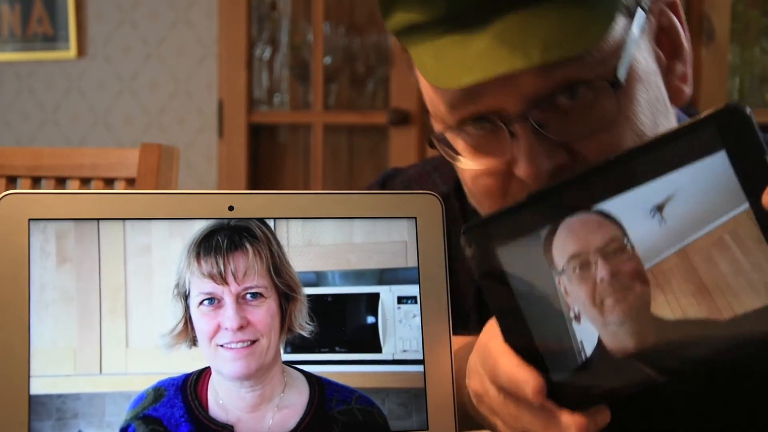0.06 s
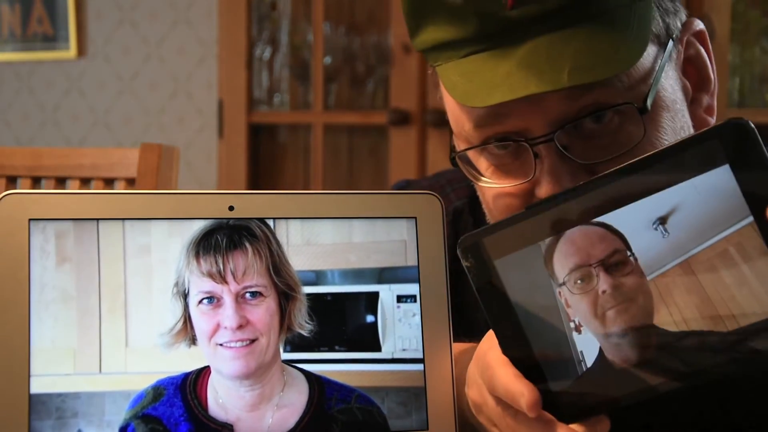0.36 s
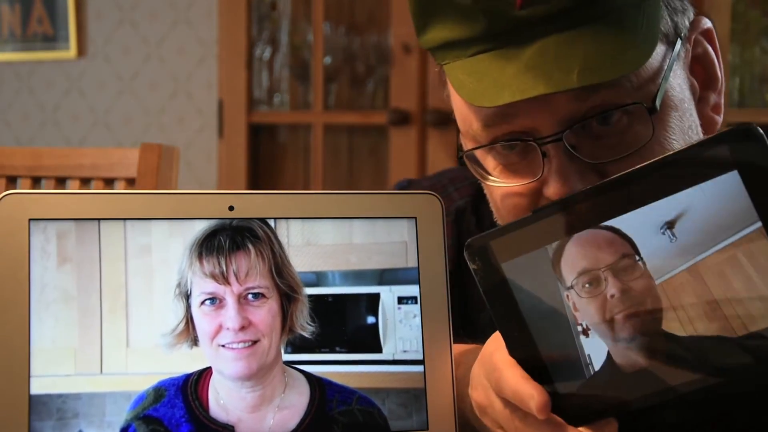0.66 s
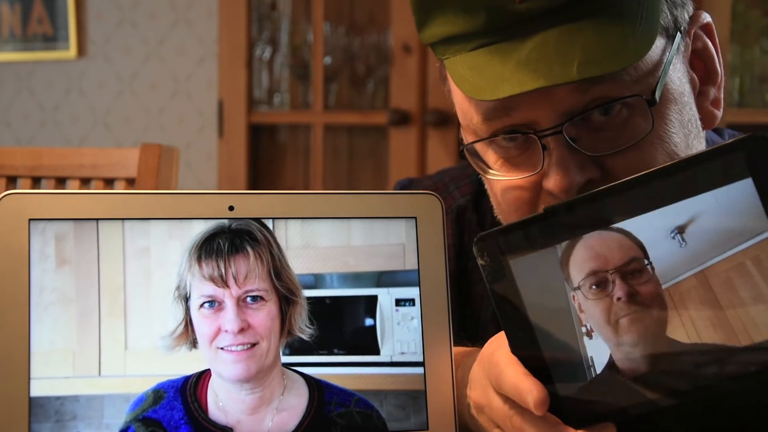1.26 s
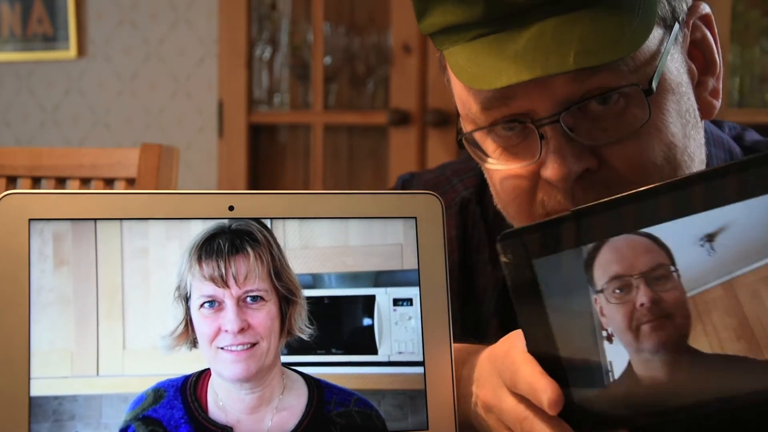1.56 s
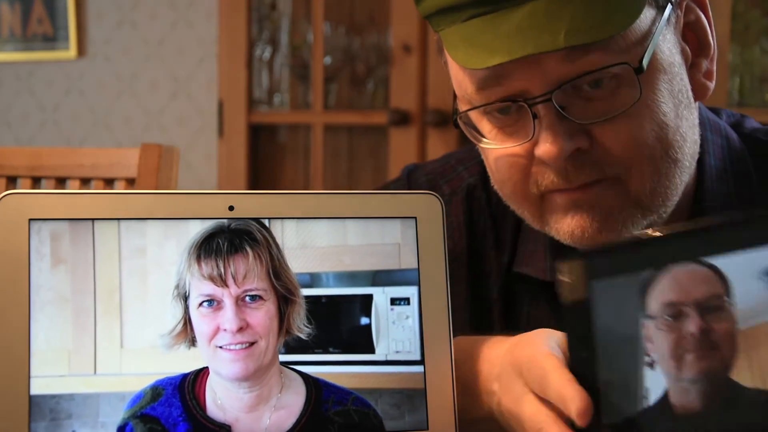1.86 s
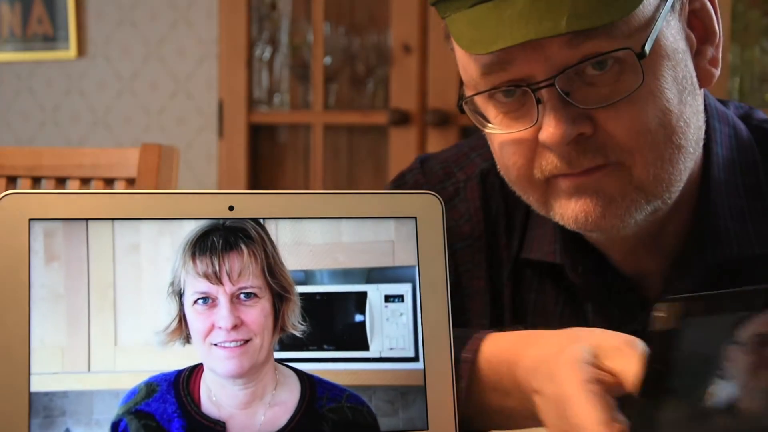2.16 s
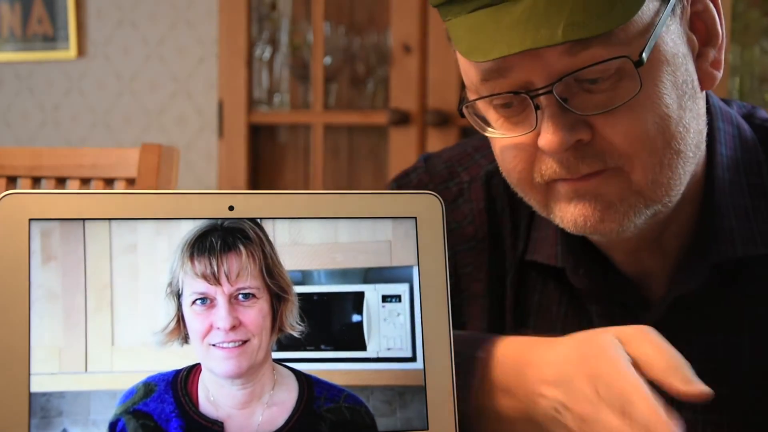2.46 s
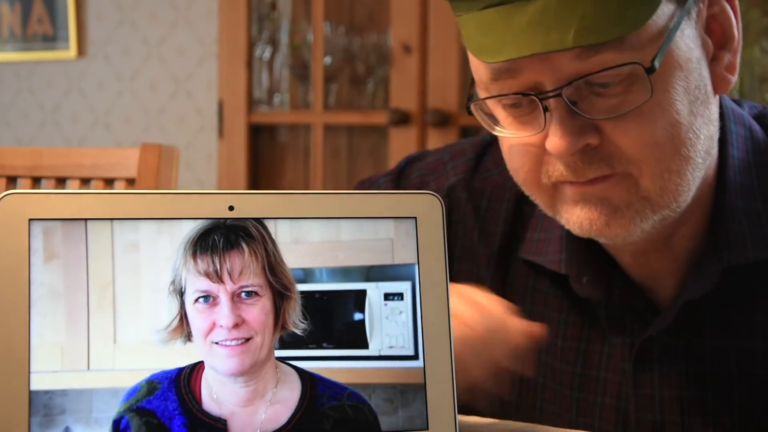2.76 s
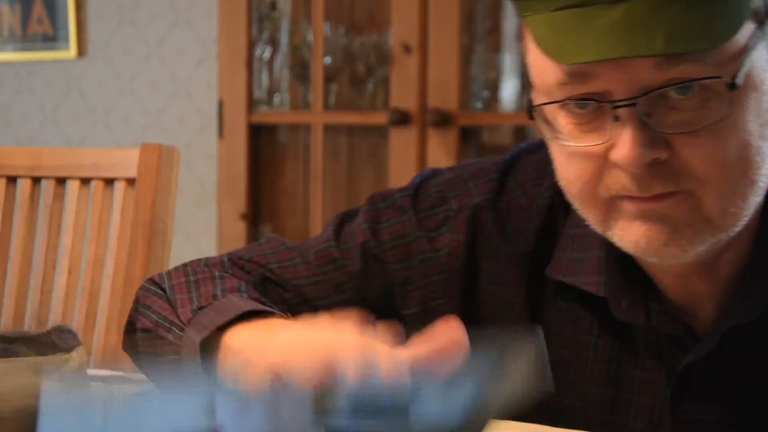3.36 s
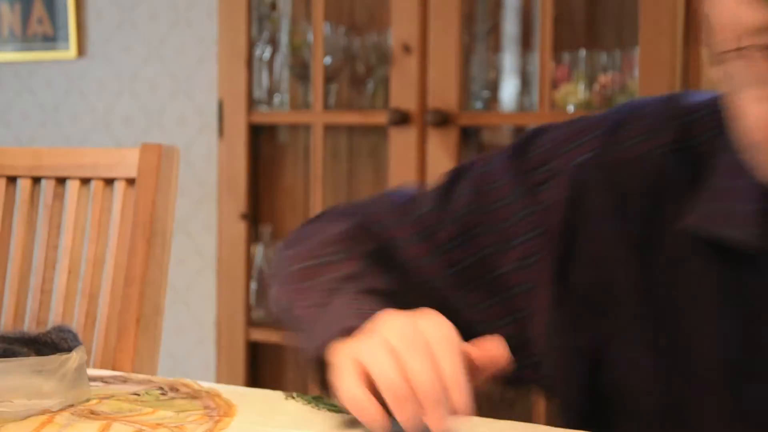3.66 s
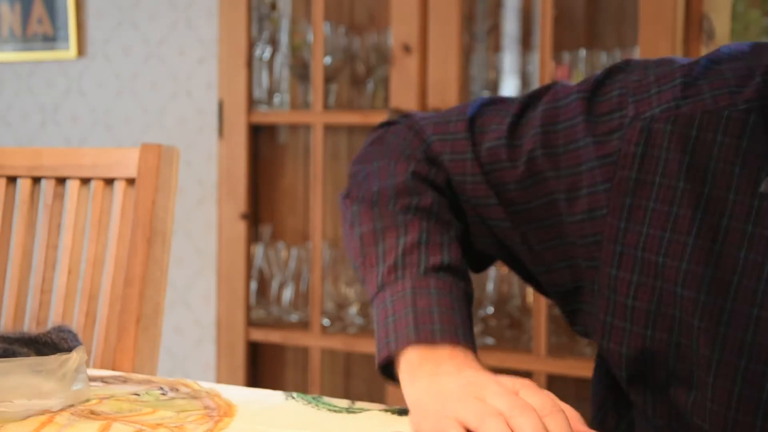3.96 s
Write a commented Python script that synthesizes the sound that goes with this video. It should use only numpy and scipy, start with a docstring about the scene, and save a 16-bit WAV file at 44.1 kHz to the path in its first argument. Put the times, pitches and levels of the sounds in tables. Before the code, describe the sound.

A laptop lid shuts with a loud thud, just after a tablet is set down.

```python
"""Putting down a tablet, shutting a laptop

In a quiet, fairly echoey dining room with a low hum and microphone hiss, sleeves rustle, a chair creaks
and hands bump a wooden table. A tablet lands on its edge, then falls flat; each knock rings briefly.
A laptop lid is slapped shut, pushing out a puff of air and overloading the microphone for a moment."""
import sys
import numpy as np
from scipy import signal
from scipy.fft import rfft, irfft, next_fast_len
from scipy.io import wavfile

SR = 44100
rng = np.random.default_rng(int(sys.argv[2]) if len(sys.argv) > 2 else 0)


def digitize_waveform(pressure):
    """Quantize a signal to 16-bit integers and store it at the path in sys.argv[1].

    Rows of a 2-D input are taken as channels; values are limited to [-1, 1].
    """
    field = np.atleast_2d(pressure).T
    bounded = np.clip(field, -1, 1)
    quanta = np.round(bounded * 32767).astype(np.int16)
    wavfile.write(sys.argv[1], SR, quanta)


N = 176400
T = np.arange(N) / SR
SIZE = next_fast_len(N + SR)  # a spare second leaves space for echoes
HZ = np.fft.rfftfreq(SIZE, 1 / SR)

# tone of the hiss, meaning how strong its lows and highs are next to each other: f/Hz, level/dB
HISS_TONE = [(30, -14), (44, -7.5), (92, -9.5), (125, -14.5), (150, -15.5), (310, -15), (360, -18.5),
             (480, -17), (600, -19.5), (1460, -23), (2550, -24.5), (4310, -22), (10600, -33),
             (16000, -39.5)]
# faint whistling bands in the hiss: f/Hz, width/Hz, level/dB
WHISTLES = [(2130, 270, -68), (4310, 140, -73.5)]
# steady rumble and hum: f/Hz, level/dB
HUM_NOTES = [(19.4, -57), (120, -66)]
# how alike left and right are, for the hiss and for other noise: f/Hz, likeness (1 = the same)
HISS_LIKENESS = [(50, 0.88), (500, 0.68), (2000, 0.55), (5000, 0.65), (9000, 0.26), (15000, 0.067)]
ROOM_LIKENESS = [(100, 1), (1000, 1), (4000, 0.97), (9000, 0.94), (15000, 0.2)]
# sleeve movements: middle t/s, width/s, level/dB, brightness/(dB per octave)
SLEEVE_MOVES = [(.06, 0.14, -58.5, -0.5), (.19, 0.031, -60, 4), (1.47, 0.046, -61.5, 4),
                (2.0, 0.29, -58.5, 3), (2.33, 0.1, -56, 1.5), (2.6, 0.035, -43.5, 0.5),
                (3.12, 0.22, -57.5, 2), (3.46, 0.032, -66, 3), (3.808, 0.036, -46, 1.5),
                (3.93, 0.036, -52.5, -2)]
# creaks of chair and case: middle t/s, width/s, f/Hz, level/dB
CREAK_EVENTS = [(.05, 0.056, 358, -58), (.19, 0.034, 462, -56), (1.173, 0.014, 1800, -58),
                (2.015, 0.016, 490, -60), (3.402, 0.0048, 343, -45), (3.981, 0.013, 351, -44)]
# bumps of hands and forearm: t/s, level/dB, brightness/(dB per octave)
BUMP_HITS = [(1.998, -26, 2), (2.452, -12.5, 3), (3.104, -14.5, -9.5), (3.395, -20.5, -1),
             (3.905, -23, 0.5), (3.971, -15.5, -3)]
# hits of the tablet (case, edge, flat back) and the lid (grab, slap, rattle): t/s, level/dB
TICK_HITS = [(1.172, -28), (2.572, -13)]
EDGE_HITS = [(2.4598, 13.5), (2.4662, 10.5)]
FLAT_HITS = [(2.6272, 14.66), (2.6358, 6.1)]
GRAB_HITS = [(3.0503, -12.5), (3.1035, -24)]
SLAP_HITS = [(3.5037, 21.1), (3.5105, 17.8)]
RATTLE_HITS = [(3.5265, 0), (3.535, -6), (3.546, -10)]
# tone of the cloth and of each kind of hit: f/Hz, level/dB
CLOTH_TONE = [(40, -2), (200, 2), (600, 7), (1500, 0), (3000, -5), (7000, -17), (16000, -30)]
TICK_TONE = [(100, -12), (700, 0), (1400, -1), (1830, -7), (2300, -11), (3200, -21), (6000, -30),
             (16000, -46)]
BUMP_TONE = [(30, -4.5), (90, -15), (160, 3.5), (260, -9.5), (380, 1.5), (800, -4), (2000, -24.5),
             (5000, -29), (16000, -42)]
EDGE_TONE = [(25, -28), (70, 1), (140, -1), (300, 0), (420, -7), (750, 1), (1150, -5), (1600, -17.5),
             (2200, -19.5), (3300, -35.5), (8000, -41.5), (16000, -53)]
FLAT_TONE = [(25, -49), (70, -2), (140, -3), (260, 2.5), (520, -1.5), (900, -11.5), (1400, -16),
             (2300, -18), (4000, -28), (7000, -40.5), (16000, -59)]
GRAB_TONE = [(30, -29), (80, -9), (165, -2), (280, -1), (600, -6), (1200, -12), (1750, -12.5),
             (4000, -18.5), (9000, -31), (16000, -50)]
SLAP_TONE = [(25, -25), (80, -4.5), (160, 0.5), (370, -2), (550, 0.5), (800, -2.5), (1200, -10),
             (1900, -16), (2500, -16.5), (3500, -22), (5000, -26), (8000, -37.5), (16000, -51)]
RATTLE_TONE = [(200, -7), (1000, 2), (2500, -3), (5000, 3), (8000, -10), (16000, -16)]
# notes of the object and low notes of the room after a hit: f/Hz, level/dB, time to fade by 60 dB (t/s)
EDGE_NOTES = [(135, -30.5, 0.37), (183, -22.5, 0.18), (297, -46, 0.25), (593, -19, 0.36), (715, -24, 0.28),
              (767, -21.5, 0.27), (900, -25, 0.2)]
FLAT_NOTES = [(65.8, -27, 0.57), (131.6, -13.5, 0.28), (176.5, -18.5, 0.39), (231, -10.5, 0.36),
              (303, -14.5, 0.12), (343, -34, 0.38), (490, -23, 0.26), (634, -36, 0.24), (1980, -34, 0.48)]
GRAB_NOTES = [(161, -31.5, 0.07), (606, -36, 0.025), (880, -42, .03)]
SLAP_NOTES = [(44, -25, 0.63), (84.3, -20, 0.22), (170, -14, 0.22), (330, -22, 0.1), (480, -13.5, 0.12),
              (659, -16.5, 0.54), (734.4, -23, 0.29), (952, -22, .3), (1085, -23, 0.42),
              (1197, -18.5, 0.35), (1302, -30, .35), (1607, -28, 0.41), (2170, -30, 0.3), (3000, -44, .35)]
# first echoes off nearby walls: delay/s, gain
WALL_ECHOES = [(.0026, 0.34), (.0098, 0.1), (0.0122, .25), (0.0202, 0.54)]
# how long the room's tail of blurred echoes takes to fade by 60 dB: f/Hz, t/s
TAIL_FADE = [(50, 0.45), (130, 0.39), (300, 0.43), (700, 0.5), (2000, 0.53), (5000, 0.43), (9000, 0.45),
             (15000, 0.17)]
# tone of that tail: f/Hz, level/dB
TAIL_TONE = [(50, -6), (200, -2.5), (450, -1), (5000, 1), (9000, -0.5), (15000, 1)]


def amp(db):
    """Turn decibels into a gain to multiply by."""
    return 10 ** (np.asarray(db) / 20)


def unit(x):
    """Scale x so that its average power is 1."""
    return x / np.sqrt(np.mean(x ** 2) + 1e-20)


def along(points, hz):
    """Read between the rows of a (frequency, value) table, on a log frequency scale."""
    freqs, values = np.transpose(points)
    return np.interp(np.log(hz + 1), np.log(freqs + 1), values)


def tone(points, tilt_db=0):
    """Turn a tone table into a gain per frequency, tilted by tilt_db per octave above 100 Hz."""
    return unit(amp(along(points, HZ) + tilt_db * np.log2(np.maximum(HZ, 100))))


def filtered(x, gain):
    """Turn each frequency of x up or down by its gain."""
    return irfft(rfft(x, SIZE) * gain, SIZE)[..., :N]


def causal(gain):
    """A filter with this gain that never sounds before it is struck (minimum phase)."""
    cepstrum = irfft(np.log(np.maximum(gain, 1e-6)), SIZE)
    cepstrum[1:SIZE // 2] *= 2
    cepstrum[SIZE // 2 + 1:] = 0
    return np.exp(rfft(cepstrum))


def delay(s):
    """A filter that makes a sound come s seconds later."""
    return np.exp(-2j * np.pi * HZ * s)


def band(hz, width_hz):
    """A filter that favours the frequencies close to hz."""
    return 1 / (1 + (2 * (HZ - hz) / width_hz) ** 2)


def swell(s, width):
    """A bell-shaped rise and fall around time s."""
    return np.exp(-((T - s) / width) ** 2 / 2)


def noise(gain, likeness):
    """Stereo noise: left and right share the middle part and get the side part with opposite signs."""
    angle = np.arccos(np.clip(along(likeness, HZ), -1, 0.9995)) / 2
    shares = np.array([np.cos(angle), np.sin(angle)])
    mid, side = filtered(rng.standard_normal((2, N)), gain * shares)
    return unit(np.array([mid + side, mid - side]))


def echo_tail(build_s=0.002):
    """Countless echoes blur into noise in which each frequency fades at its own speed."""
    hz, t, slices = signal.stft(noise(1, ROOM_LIKENESS)[:, :SR], SR, nperseg=256)
    fade = amp(-60 * t / along(TAIL_FADE, hz)[:, None])
    tail = signal.istft(slices * fade, SR, nperseg=256)[1][:, :SR]
    tail *= 1 - np.exp(-T[:SR] / build_s)
    return tail / np.linalg.norm(tail[0])


def room(tail_db):
    """Two filters: the direct sound with its first wall echoes, and the room's tail."""
    near = 1 + sum(gain * delay(s) for s, gain in WALL_ECHOES)
    tail = amp(tail_db + along(TAIL_TONE, HZ)) * rfft(echo_tail(), SIZE)
    total = np.hypot(1, amp(tail_db))
    return near / total, tail / total


def contact(tail_db, chatter_db, chatter_hz=1390, fade_s=0.025):
    """The spectrum of one touch: a push, hard surfaces chattering above chatter_hz, and the echoes."""
    near, tail = room(tail_db)
    burst = noise(1, ROOM_LIKENESS)[:, :SR] * amp(-60 * T[:SR] / fade_s)
    push = 1 / (1 + 1j * HZ / chatter_hz)  # keeps the lows; 1 - push keeps the highs
    chatter = (1 - push) * rfft(burst / np.linalg.norm(burst[0]), SIZE)
    return near * push + amp(chatter_db) * chatter + tail


def knock(hits, tone_table, tail_db, chatter_db):
    """Short contacts take on the tone of the thing that is hit."""
    force = sum(amp(db) * delay(s) * contact(tail_db, chatter_db) for s, db in hits)
    return irfft(force * causal(tone(tone_table)), SIZE)[:, :N]


def ring(start, notes, attack_s, waver):
    """A knock sets the object and the room's low resonances ringing briefly, wavering a little."""
    t, out = T[:SR], np.zeros(N + SR)
    rise = 1 - np.exp(-t / attack_s)
    for hz, db, fade_s in notes:
        drift = waver * np.cumsum(rng.standard_normal(SR)) * np.sqrt(hz) / SR
        loudness = rise * amp(db - 60 * t / fade_s)
        out[round(start * SR):][:SR] += loudness * np.sin(2 * np.pi * (hz * t + drift))
    return out[:N]


def background(hiss_db=-54, low_cut_hz=30, whine_hz=15703, whine_db=-82):
    """Room noise and microphone hiss with two faint whistles, a steady hum and a thin electronic whine."""
    whistles = sum(amp(db) * noise(band(hz, width), HISS_LIKENESS) for hz, width, db in WHISTLES)
    notes = HUM_NOTES + [(whine_hz, whine_db)]
    hum = sum(amp(db) * np.sqrt(2) * np.sin(2 * np.pi * (hz * T + rng.random())) for hz, db in notes)
    low_cut = HZ ** 2 / np.hypot(HZ ** 2, low_cut_hz ** 2)
    hiss = amp(hiss_db) * noise(tone(HISS_TONE) * low_cut, HISS_LIKENESS)
    return hiss + whistles + hum


def sleeves():
    """The rustle of cloth swells and fades with each arm movement."""
    cloth = noise(1, ROOM_LIKENESS)
    return sum(amp(db) * swell(s, width) * filtered(cloth, tone(CLOTH_TONE, tilt_db))
               for s, width, db, tilt_db in SLEEVE_MOVES)


def creaks(width_share=0.15):
    """Brief rubbing makes the chair or the case sound in a narrow band around one pitch."""
    out = np.zeros(N)
    for s, width, hz, db in CREAK_EVENTS:
        rubbing = filtered(rng.standard_normal(N), band(hz, width_share * hz))
        out += amp(db) * swell(s, width) * unit(rubbing)
    return out


def case_ticks():
    """The tablet's case gives two small ticks."""
    return knock(TICK_HITS, TICK_TONE, tail_db=2, chatter_db=1)


def hand_bumps():
    """Hands and forearm bump the table softly, and the room echoes."""
    bumps = sum(amp(db) * delay(s) * causal(tone(BUMP_TONE, tilt_db)) for s, db, tilt_db in BUMP_HITS)
    near, tail = room(tail_db=8)
    return irfft(bumps * (near + tail), SIZE)[:, :N]


def tablet():
    """The edge knocks on the table, then the whole back drops with a deeper thud."""
    edge = knock(EDGE_HITS, EDGE_TONE, tail_db=4, chatter_db=3.5)
    edge += ring(EDGE_HITS[0][0], EDGE_NOTES, attack_s=0.005, waver=9.4)
    flat = knock(FLAT_HITS, FLAT_TONE, tail_db=4.5, chatter_db=-0.5)
    flat += ring(FLAT_HITS[0][0], FLAT_NOTES, attack_s=0.0027, waver=12.7)
    return edge + flat


def laptop():
    """A hand grabs the lid, which slaps onto the base twice in quick succession, then rattles."""
    grab = knock(GRAB_HITS, GRAB_TONE, tail_db=-5, chatter_db=-8)
    grab += ring(GRAB_HITS[0][0], GRAB_NOTES, attack_s=0.0005, waver=4.7)
    slap = knock(SLAP_HITS, SLAP_TONE, tail_db=0.6, chatter_db=0)
    slap += ring(SLAP_HITS[0][0], SLAP_NOTES, attack_s=0.0024, waver=11.2)
    rattle = knock(RATTLE_HITS, RATTLE_TONE, tail_db=-8, chatter_db=-4.5)
    return grab + slap + rattle


def air_puff(level_db=-12, rise_s=0.0013, fall_s=0.0003):
    """Air squeezed from under the lid makes one pulse that grows until the lid lands."""
    shut = SLAP_HITS[0][0]
    before, after = np.maximum(shut - T, 0), np.maximum(T - shut, 0)
    return -amp(level_db) * np.exp(-before / rise_s - after / fall_s)


def scene(balance_db=0.2):
    """Add up all the sounds; they come from nearly straight ahead."""
    mix = background() + sleeves() + creaks() + case_ticks() + hand_bumps()
    mix += tablet() + laptop() + air_puff()
    return mix * amp([[balance_db], [-balance_db]])


def record(dry, hardness=8, top_hz=16300):
    """The overloaded microphone flattens the loudest peaks; everything above top_hz is then cut."""
    clipped = dry / (1 + np.abs(dry) ** hardness) ** (1 / hardness)
    return filtered(clipped, HZ < top_hz)


dry = scene()
out = record(dry)
digitize_waveform(out)
```